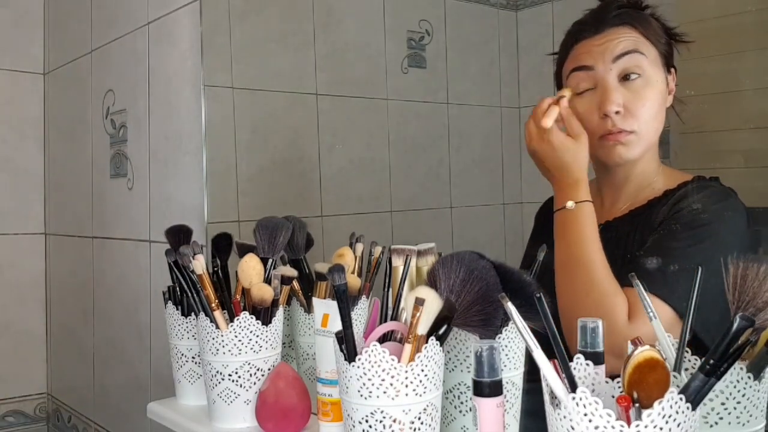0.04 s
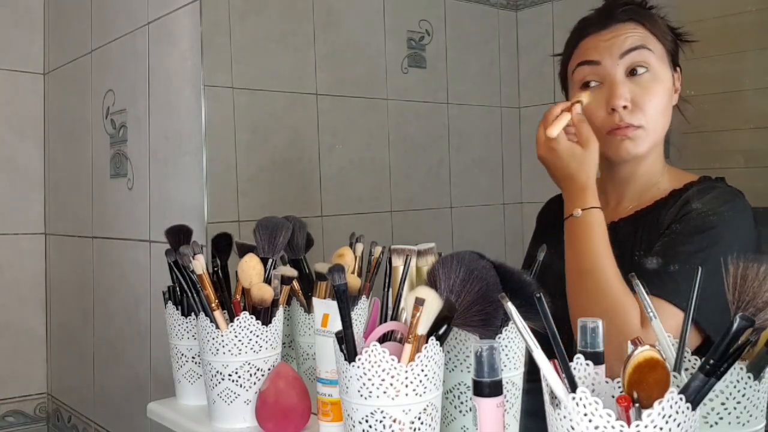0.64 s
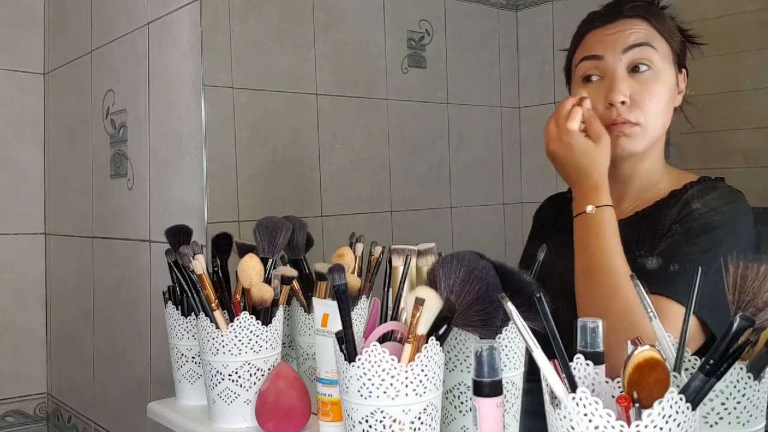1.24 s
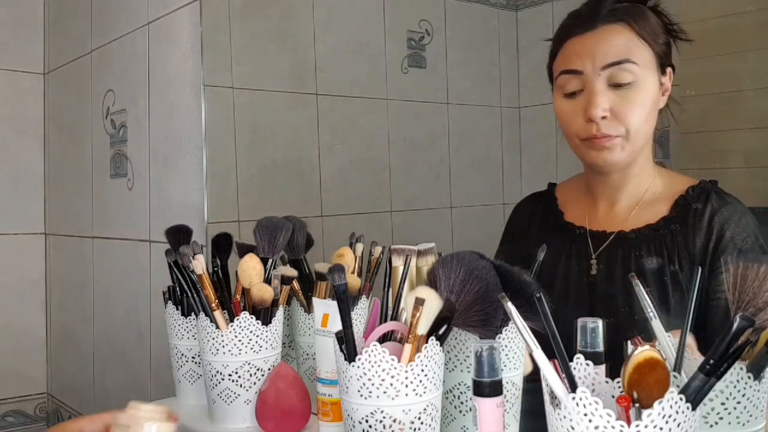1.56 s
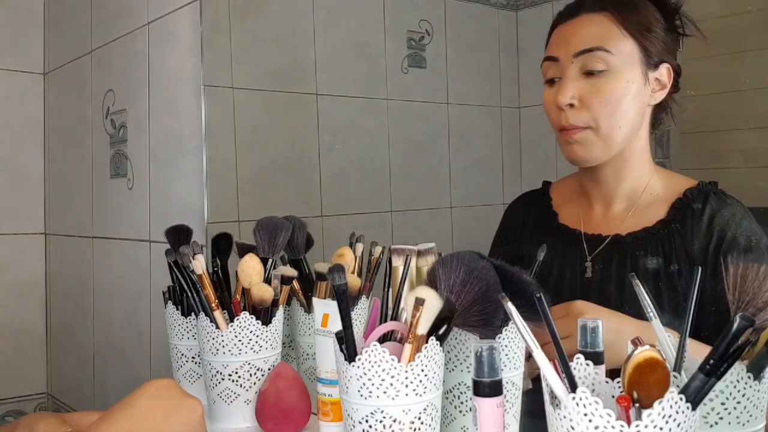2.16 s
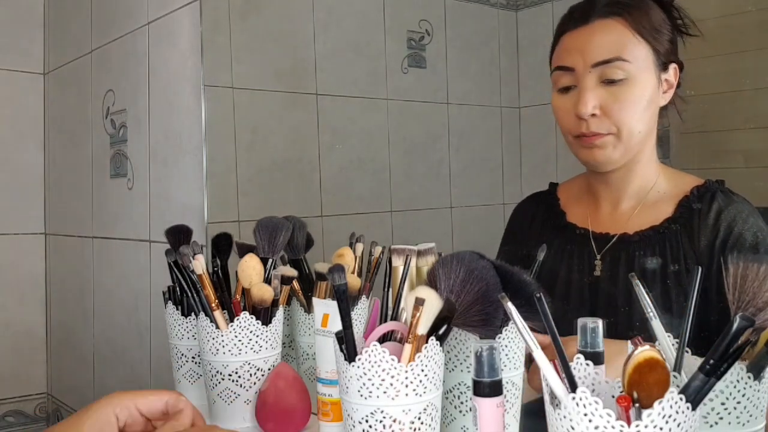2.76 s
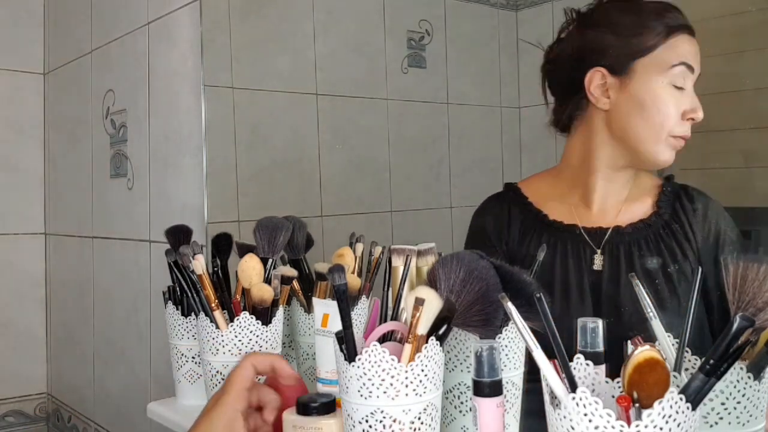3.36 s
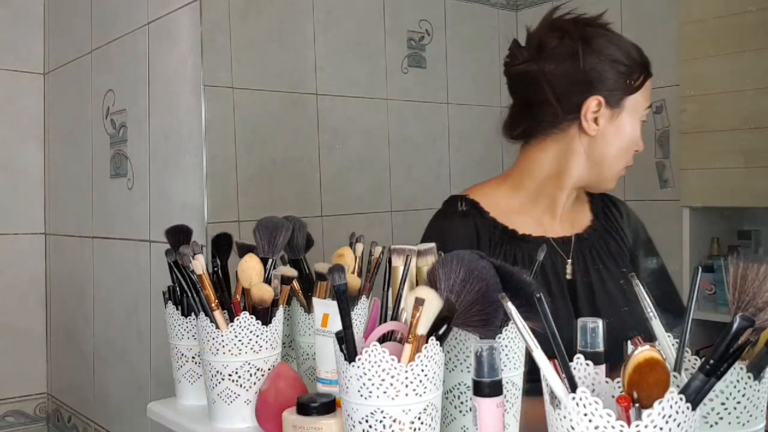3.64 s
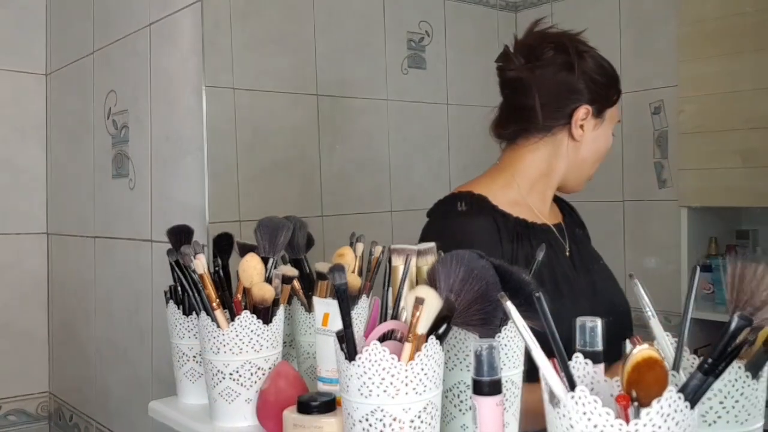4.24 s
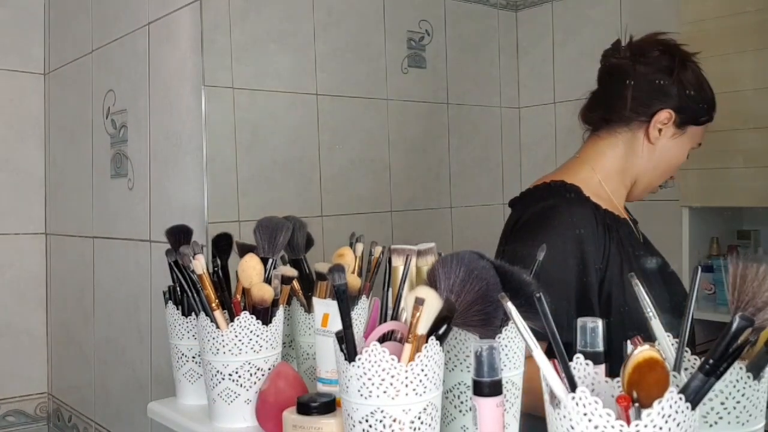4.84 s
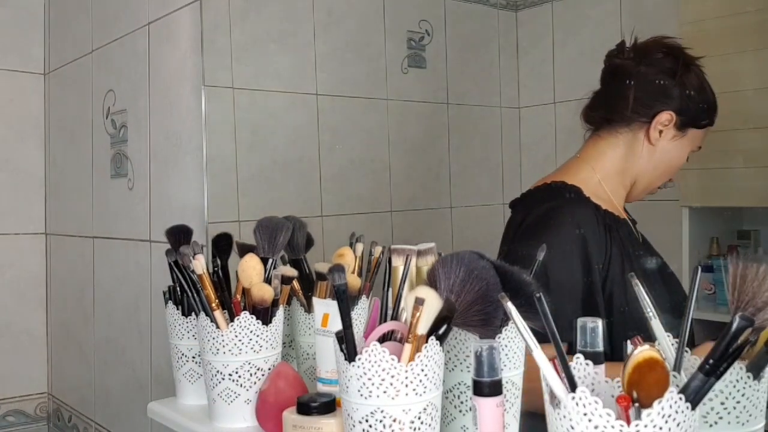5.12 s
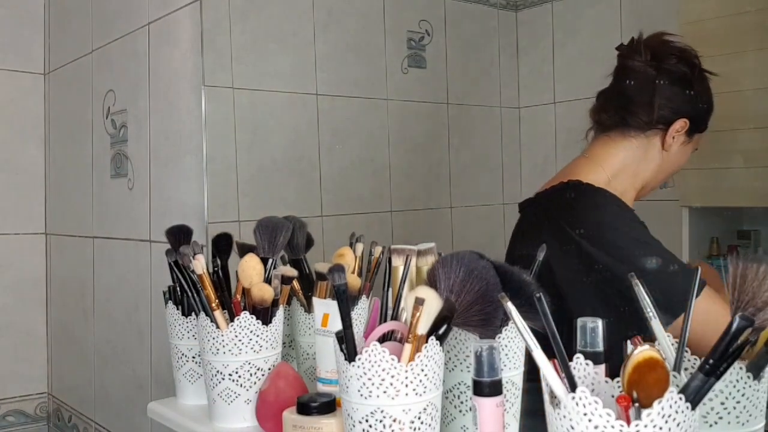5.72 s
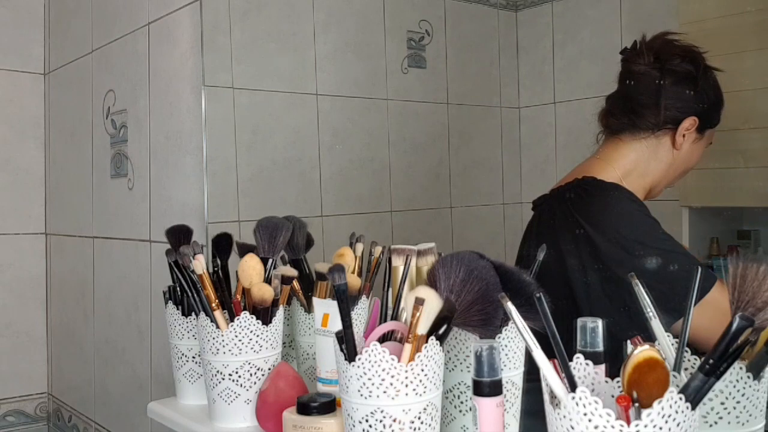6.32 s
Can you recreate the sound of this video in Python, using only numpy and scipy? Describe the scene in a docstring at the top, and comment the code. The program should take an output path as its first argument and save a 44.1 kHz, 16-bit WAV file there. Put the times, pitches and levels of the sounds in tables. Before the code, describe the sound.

Small plastic makeup items click lightly, a jar clatters onto a shelf, then dull cabinet knocks and clothes rustle over faint hiss.

```python
"""Plastic makeup items click lightly in a small tiled bathroom, each snap ringing its case and the shelf.
One slides off, a jar is set down with a ringing clatter, then come dull knocks on cabinet panels,
soft bumps and the rustle of clothes. Underneath sits a bed of faint hiss and a far engine's throb.
The opening plays at triple speed: hiss and engine sit higher, and the clicks' room ring is shorter."""
import sys
import numpy as np
from scipy import signal
from scipy.fft import rfft, irfft
from scipy.io import wavfile
from scipy.ndimage import uniform_filter1d

SR = 44100
rng = np.random.default_rng(int(sys.argv[2]) if len(sys.argv) > 2 else 0)


def persist_wave(psi):
    """Save psi, clipped to +-1, as 16-bit WAV."""
    counts = np.round(np.clip(psi, -1, 1) * 32767).astype(np.int16)
    wavfile.write(sys.argv[1], SR, np.atleast_2d(counts).T)


N = 285809

# small items touching: (time [s], level [dB], pitch [Hz], bandwidth [octaves])
ITEM_CLICKS = [(1.508, -46, 1800, 1.9), (1.696, -44, 2180, 3), (1.711, -36.5, 1685, 1.1),
               (1.714, -41.5, 940, 1.4), (1.738, -46, 4200, 2.2), (1.807, -34.5, 5530, 0.39),
               (1.812, -36.5, 1876, 1.5), (1.998, -46.5, 1920, 1.9), (2.112, -40.5, 4000, 3.9),
               (2.117, -50.5, 624, 1.2), (2.441, -52.5, 12000, .4), (2.441, -61.5, 1070, 1.8),
               (2.501, -52, 1800, 4.2), (2.546, -58.5, 630, 1.3), (2.574, -53, 2100, 3.3),
               (2.615, -52.5, 1560, 3.5), (2.758, -53, 4750, 3.3), (3.274, -42, 2400, 2.1),
               (3.577, -57, 7470, 0.68), (3.638, -54.5, 4280, 0.71), (4.628, -45.5, 2460, 0.68),
               (4.631, -45, 1383, 0.46), (4.634, -36.5, 624, 0.81), (4.643, -57, 6130, 0.08)]
# resonances of a plastic case: (frequency [multiple of the click's pitch], relative level [dB])
CASE_MODES = [(0.847, -6.5), (1.002, 13), (1.09, 3), (1.22, -6)]
# the jar meeting the shelf: (time [s], ring level [dB], clatter level [dB], brightness [Hz])
JAR_CONTACTS = [(3.274, -30, -32, 14080), (3.285, -30.5, -30.5, 2940), (3.428, -44.5, -46.5, 1800),
                (3.762, -62.5, -71, 910), (3.825, -64, -71, 769)]
# ring of jar and shelf: (frequency [Hz], relative level [dB], t60 [s])
JAR_SHELF_MODES = [(74.5, -19, 0.68), (270, -16.5, .42), (488.6, 6, 0.23), (538, -1.5, 0.3), (615, 0.5, .3),
                   (665, 3, 0.2), (713, 0, 0.23), (782, -12, 0.12), (820, -4.5, 0.26), (1006, -9.5, 0.37),
                   (1080, -22, 0.24), (1260, 3, 0.094), (1500, -26, 0.23), (1670, -21, 0.19),
                   (1960, -12.5, 0.26), (2260, -0.5, 0.12), (2800, -21, 0.15), (2990, -6.5, 0.22),
                   (4610, -11, 0.17), (6185, -33, 0.23)]
# colour of the jar's clatter: (frequency [Hz], relative level [dB])
JAR_EQ = [(25, -36), (70, -9), (140, -20), (330, -8.5), (480, 0.5), (750, -3), (1100, -2), (1900, -8),
          (2700, -13.5), (3800, -22), (5400, -20), (8000, -24.5), (12000, -26.5), (16000, -38.5)]
# knocks at the cabinet: (time [s], ring level [dB], clatter level [dB])
CABINET_KNOCKS = [(4.558, -28, -34.5), (4.625, -34, -39.5), (4.692, -40, -56), (4.916, -56, -50.5),
                  (5.188, -38.5, -51), (5.404, -45.5, -52), (5.511, -51, -55.5), (5.621, -41.5, -54),
                  (5.757, -44.5, -50.5), (5.909, -48.5, -53.5), (6.02, -53, -53), (6.139, -54, -75)]
# panel ring; the close pair near 480 Hz throbs: (frequency [Hz], relative level [dB], t60 [s])
PANEL_MODES = [(69.1, -30.5, 1), (144.8, -14, 0.4), (194.4, -17, 0.18), (239.8, -9.5, 0.27),
               (365, -18.5, 0.52), (450.8, -2, 0.39), (474, 4.5, 0.38), (499.4, -9.5, 0.43),
               (642.5, -12.5, 0.29), (728, -16.5, 0.22), (815, -21, 0.38), (1373, -14.5, 0.13),
               (1360, -34, 0.15)]
# colour of the cabinet's clatter: (frequency [Hz], relative level [dB])
CABINET_EQ = [(35, -11), (70, -10), (110, -19), (200, 11), (310, -2.5), (450, 12.5), (720, -7), (1000, -9),
              (1400, -8.5), (2000, -16), (2800, -13), (4000, -17), (6200, -17.5), (14000, -20)]
# soft bumps of things being shifted, and a footfall at 4.129 s: (time [s], level [dB], pitch [Hz])
SOFT_BUMPS = [(1.754, -56, 238), (3.812, -61, 400), (4.129, -65, 195), (4.566, -64, 137.7),
              (4.665, -52, 71), (4.858, -64, 190), (6.305, -63, 244.5)]
# an item sliding off the shelf: (peak time [s], length [s], level [dB])
SLIDE_STROKES = [(1.98, 0.12, -47)]
# bright colour of the slide: (frequency [Hz], relative level [dB])
SLIDE_EQ = [(300, -13), (1400, -17), (3000, -8), (5000, -2), (8000, -1.5), (11000, -6.5), (16000, -8.5)]
# clothes, one swish per move of the body: (peak time [s], length [s], level [dB])
CLOTH_STROKES = [(3.815, 0.19, -57), (3.915, .21, -53.5), (4.16, 0.14, -58.5), (4.335, 0.12, -66),
                 (5.2, 0.37, -67), (5.495, 0.2, -60.5), (5.8, 0.29, -64), (6.13, 0.31, -65.5),
                 (6.46, 0.8, -58.5)]
# colour of the fabric: (frequency [Hz], relative level [dB])
CLOTH_EQ = [(100, -8), (250, -5), (450, 4), (900, 4.5), (2000, 0.5), (4000, 2.5), (8000, 1), (12000, -0.5),
            (16000, -13)]
# reverb tail of the tiled room: (frequency [Hz], t60 [s])
ROOM_DECAY = [(70, 0.6), (400, 0.5), (1300, 0.34), (3000, 0.48), (6000, 0.37), (14000, 0.49)]
# the far engine's revs: (time [s], firing rate at normal speed [Hz])
ENGINE_REVS = [(0, 105), (.3, 88.6), (.9, 117.7), (1.12, 97), (1.36, 68.4), (1.47, 75.4), (1.66, 102.8),
               (2.04, 104.9), (2.18, 76), (2.42, 96.1), (2.65, 99.5), (3.7, 89), (4.15, 76.7), (4.97, 69.4),
               (5.1, 112.7), (5.5, 105.4), (6.15, 100.8), (6.48, 113)]
# colour of the hiss at normal speed: (frequency [Hz], relative level [dB])
HISS_EQ = [(25, -3), (70, 4), (150, -5.5), (280, -11), (600, -13.5), (750, -7.5), (950, -17), (2000, -14),
           (3650, -14.5), (4450, 0.5), (6900, -2), (8500, -12), (11000, -19), (16000, -26)]
# colour of the hiss at triple speed: (frequency [Hz], relative level [dB])
FAST_HISS_EQ = [(25, -19), (70, -21), (110, -4.5), (210, -7), (320, -6), (580, -14.5), (1050, -17),
                (6000, -18.5), (7300, -16.5), (10800, -19), (13400, -2.5), (15000, -5), (16000, -9)]

FAST_UNTIL_S, FAST_SPEED = 2.821, 3
MONO_BELOW_HZ, TOP_HZ = 670, 15900  # the stereo image narrows below the first; the mix ends at the second
CABINET_LAG_S = .00043  # left-channel delay that places a sound to the right
TIME = np.arange(N) / SR
RING_TIME = np.arange(SR) / SR


def plastic_clicks(fast_snap=2.8, normal_snap=10, case_q=22):
    """Light plastic contacts: a snap and its echoes, coloured by the item's size, its case and the shelf."""
    out = np.zeros((2, N))
    for s, db, pitch_hz, octaves in ITEM_CLICKS:
        low_hz, high_hz = pitch_hz / 2 ** (octaves / 2), pitch_hz * 2 ** (octaves / 2)
        case_db = 16 - 12.5 * octaves  # the wider the click, the less its case rings
        shelf_db = -16.5 - 2 * np.log2(low_hz / 1000)  # thin clicks stir the shelf less
        speed, snap_gain = (FAST_SPEED, fast_snap) if s < FAST_UNTIL_S else (1, normal_snap)
        snap = rng.standard_normal((2, SR)) * np.exp(-RING_TIME / .00032)
        crack = tiled_room([(100, 0), (1000, 0)], speed) + snap_gain * snap  # flat EQ
        body = unit_hit(cut(cut(crack, low_hz, "high"), high_hz, "low"))
        case = unit_hit(sum(undb(mode_db) * resonate(crack, k * pitch_hz, k * pitch_hz / case_q)
                            for k, mode_db in CASE_MODES if k * pitch_hz < TOP_HZ))
        shelf = resonate(crack, 547, 210) + undb(-8.5) * resonate(crack, 1140, 150)
        shelf = unit_hit(cut(shelf, 2800, "low"))
        add(out, s, undb(db) * unit_hit(body + undb(case_db) * case + undb(shelf_db) * shelf))
    return out


def jar_on_shelf():
    """A jar lands with a hard attack, then settles in fainter, duller taps."""
    return blows(JAR_CONTACTS, JAR_SHELF_MODES, JAR_EQ, attack_s=.0008, lag_s=0, spread=.4)


def cabinet_knocks(average_bright_hz=1100, db_per_octave=13):
    """Dull knocks on cabinet panels; a harder knock has a brighter clatter."""
    s, ring_db, clatter_db = np.transpose(CABINET_KNOCKS)
    bright_hz = average_bright_hz * 2 ** ((clatter_db - clatter_db.mean()) / db_per_octave)
    hits = zip(s, ring_db, clatter_db, bright_hz)
    return blows(hits, PANEL_MODES, CABINET_EQ, attack_s=.006, lag_s=CABINET_LAG_S, spread=.25)


def blows(hits, modes, eq, attack_s, lag_s, spread):
    """A struck panel rings while its clatter, duller for a soft contact, fills the room."""
    out = np.zeros((2, N))
    attack = 1 - np.exp(-RING_TIME / attack_s)
    for s, ring_db, clatter_db, bright_hz in hits:
        tone = panel_ring(modes, lag_s, spread)
        clatter = unit_hit(cut(tiled_room(eq), bright_hz, "low", order=1))
        add(out, s, (undb(ring_db) * tone + undb(clatter_db) * lag_left(clatter, lag_s)) * attack)
    return out


def panel_ring(modes, lag_s, spread):
    """Decaying modes, balanced anew by each blow; the high ones spread wider in stereo."""
    out = 0
    for hz, db, t60 in modes:
        chance = rng.standard_normal(4)
        gain, detune = undb(db + 1.3 * chance[0]), 1 + .002 * chance[1]
        scatter = spread * min(hz / MONO_BELOW_HZ, 2) ** 2 * chance[2:, None]
        phase = scatter - 2 * np.pi * hz * np.array([[lag_s], [0]])
        out = out + gain * np.sin(2 * np.pi * hz * detune * RING_TIME + phase) * decay(t60)
    return unit_hit(out)


def bumps(thud_db=-62.5, thud_hz=301, thud_delay_s=.014, thud_follow=.2):
    """Soft bumps of things being shifted and a footfall, plus a thud just behind each knock that partly follows
    its level."""
    out = np.zeros((2, N))
    for s, db, hz in SOFT_BUMPS:
        add(out, s, soft_contact(db, hz))
    average_db = np.mean([ring_db for _, ring_db, _ in CABINET_KNOCKS])
    for s, ring_db, _ in CABINET_KNOCKS:
        db = thud_db + thud_follow * (ring_db - average_db)
        add(out, s + thud_delay_s, soft_contact(db, thud_hz))
    return out


def soft_contact(db, hz, length_s=.063):
    """A short low swell in one broad resonance, with no click."""
    width_hz, size = .76 * hz, int(length_s * SR)
    rumble = resonate(resonate(rng.standard_normal(SR), hz, width_hz), hz, width_hz)
    push = undb(db) * unit(rumble[-size:] * signal.windows.tukey(size))
    return lag_left([push, push], CABINET_LAG_S)


def friction(strokes, eq, grain_db, rise_share=.36):
    """Rubbing noise that catches and slips, swelling as each stroke speeds up and fading as it slows."""
    swell = 0
    for s, length_s, db in strokes:
        start, end = s - rise_share * length_s, s + (1 - rise_share) * length_s
        motion = np.interp(TIME, [start, s, end], [0, 1, 0])
        swell = swell + undb(db) * np.sin(np.pi / 2 * motion) ** 2
    return swell * unit(noise(eq, N) * undb(grain_db * wander(160)))


def tiled_room(eq, speed=1, ripple_db=3.5, spacing_hz=45, early_gain=.38, early_s=.099):
    """A crack thrown between tiled walls: strong early echoes, then each band dying at its own rate."""
    hz = np.fft.rfftfreq(SR, 1 / SR)
    # many small resonances of the struck thing ripple the spectrum
    ripple = np.interp(hz / (spacing_hz * speed), np.arange(1000), rng.standard_normal(1000))
    spectrum = rfft(noise(eq, SR)) * undb(ripple_db * ripple * hz / (hz + MONO_BELOW_HZ))
    centres_hz, t60s = np.transpose(ROOM_DECAY)
    tail = 0
    for t60, share in zip(t60s, np.eye(len(t60s))):
        band = by_hz(np.column_stack([centres_hz, share]), hz)
        tail = tail + irfft(spectrum * band, SR) * decay(t60 / speed)
    early_lift = 1 + early_gain * np.exp(-(RING_TIME * speed / early_s) ** 2)
    return unit_hit(tail * early_lift)


def far_engine(start_db=-86, approach_db_per_s=2.11, octave_db=-9, waver=.018, throb_db=3.5):
    """An engine through the walls, slowly drawing nearer: a wavering firing tone and a weak octave."""
    firing_hz = np.interp(TIME, *np.transpose(ENGINE_REVS))
    speed = np.where(TIME < FAST_UNTIL_S, FAST_SPEED, 1)
    phase = 2 * np.pi * np.cumsum(firing_hz * speed * (1 + waver * wander(70))) / SR
    tone = np.sin(phase) + undb(octave_db) * np.sin(2 * phase)
    boom_db = 11.5 / (1 + ((firing_hz - 75.7) / 2.8) ** 2)  # the revs pass through a room resonance
    return unit(tone) * undb(start_db + approach_db_per_s * TIME + boom_db + throb_db * wander(22))


def hiss(fast_db=-60, normal_db=-58.5):
    """A bed of microphone hiss that drops in pitch when the speed snaps back to normal."""
    fast = noise(FAST_HISS_EQ, N) * undb(fast_db)
    normal = noise(HISS_EQ, N) * undb(normal_db)
    return np.where(TIME < FAST_UNTIL_S, fast, normal)


def noise(eq, size):
    """Stereo noise shaped by an EQ curve; long waves reach both channels alike."""
    hz = np.fft.rfftfreq(size, 1 / SR)
    mid, side = np.exp(2j * np.pi * rng.random((2, len(hz)))) * undb(by_hz(eq, hz))
    side = side * (hz / np.hypot(hz, MONO_BELOW_HZ)) ** .49
    return unit(irfft(np.array([mid + side, mid - side]), size))


def wander(rate_hz):
    """Smooth random modulation with a spread near 1."""
    step = int(SR / rate_hz)
    return uniform_filter1d(np.repeat(rng.standard_normal(N // step + 1), step), step)[:N]


def decay(t60):
    """An envelope that falls 60 dB in t60 seconds."""
    return np.exp(-np.log(1000) * RING_TIME / t60)


def undb(db):
    """Decibels to gain."""
    return 10 ** (np.asarray(db) / 20)


def unit(x):
    """Normalise to rms 1."""
    return x / np.sqrt(np.mean(x ** 2))


def unit_hit(x):
    """Normalise a hit to rms 1 over its first 20 ms."""
    return x / np.sqrt(np.mean(x[:, :900] ** 2))


def by_hz(curve, hz):
    """Read a curve on a log-frequency axis."""
    points_hz, values = np.transpose(curve)
    return np.interp(np.log(hz + 1), np.log(points_hz), values)


def cut(x, hz, kind, order=2):
    """Low-pass or high-pass."""
    return signal.sosfilt(signal.butter(order, min(hz, SR / 2 - 1000), kind, fs=SR, output="sos"), x)


def resonate(x, hz, width_hz):
    """One resonant band-pass."""
    return signal.lfilter(*signal.iirpeak(hz, hz / width_hz, SR), x)


def lag_left(x, lag_s):
    """A sound from the right reaches the left channel later."""
    return np.array([np.roll(x[0], int(lag_s * SR)), x[1]])


def add(out, s, sound):
    """Mix a sound in at time s."""
    start = int(s * SR)
    out[:, start:start + sound.shape[1]] += sound[:, :N - start]


def scene():
    """The handling sounds up front, over the bed of hiss and engine."""
    impacts = jar_on_shelf() + cabinet_knocks()
    slide = friction(SLIDE_STROKES, SLIDE_EQ, grain_db=2.5)
    clothes = friction(CLOTH_STROKES, CLOTH_EQ, grain_db=1)
    return plastic_clicks() + impacts + bumps() + slide + clothes + hiss() + far_engine()


def record(dry):
    """A steep low-pass takes the very top off the mix."""
    return signal.sosfilt(signal.ellip(10, .1, 70, TOP_HZ, fs=SR, output="sos"), dry)


dry = scene()
out = record(dry)
persist_wave(out)
```